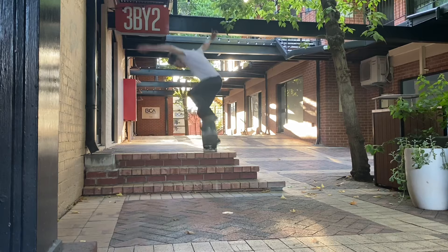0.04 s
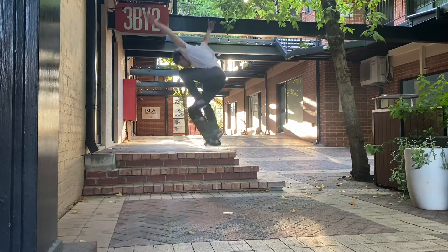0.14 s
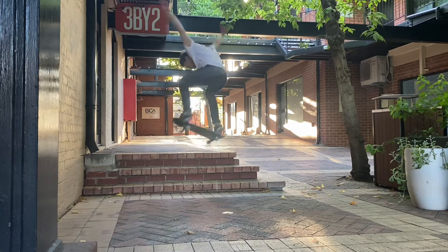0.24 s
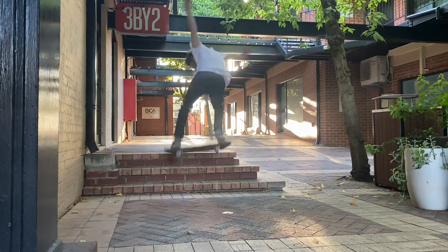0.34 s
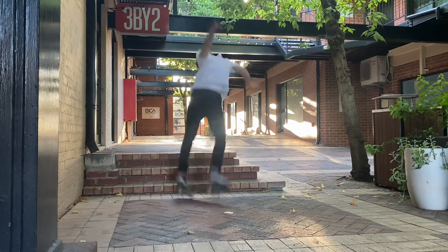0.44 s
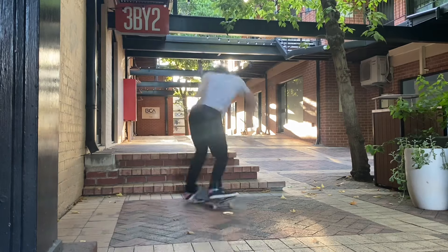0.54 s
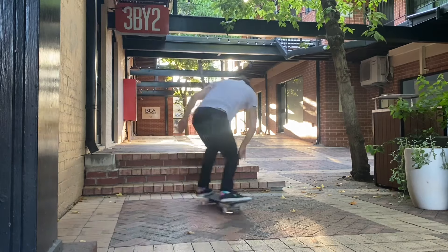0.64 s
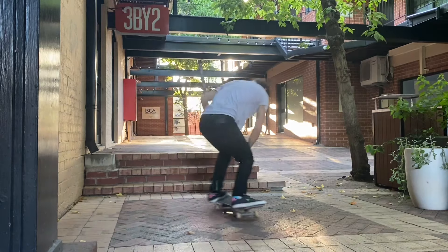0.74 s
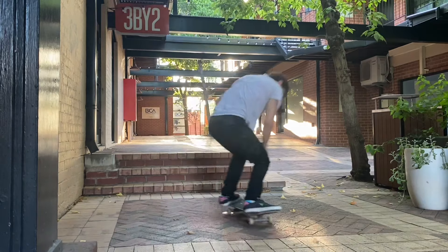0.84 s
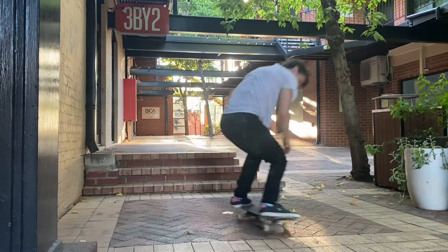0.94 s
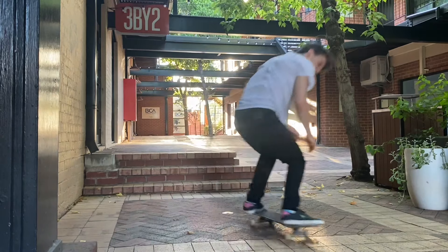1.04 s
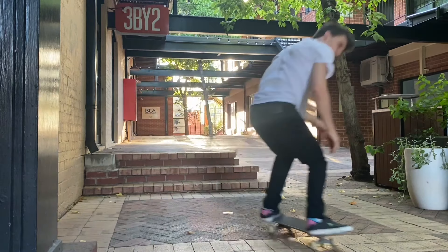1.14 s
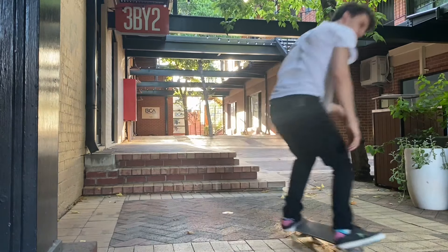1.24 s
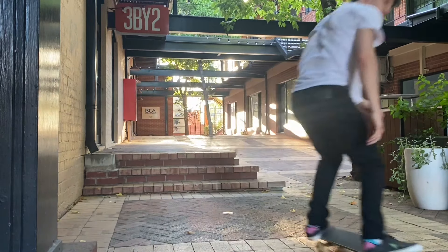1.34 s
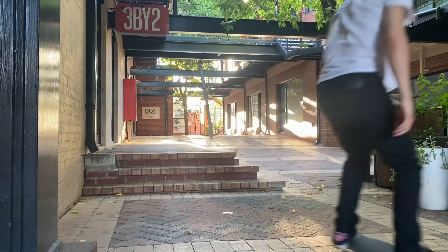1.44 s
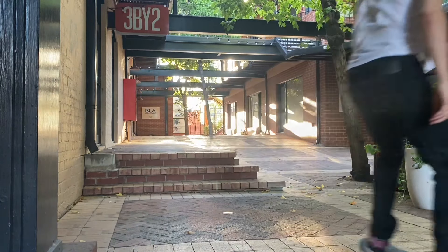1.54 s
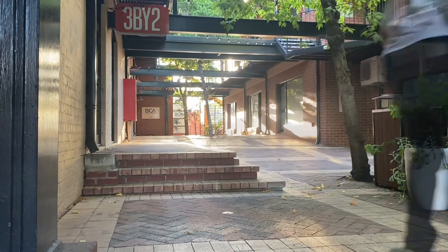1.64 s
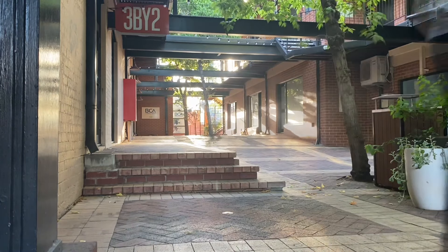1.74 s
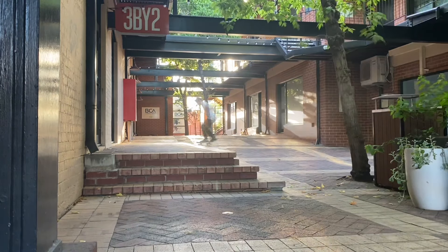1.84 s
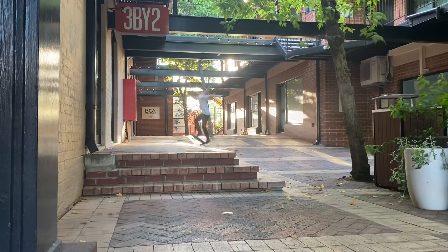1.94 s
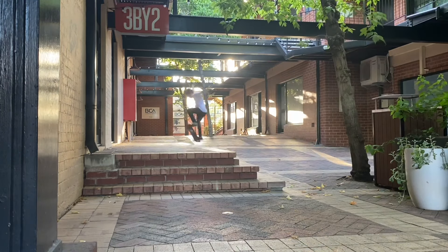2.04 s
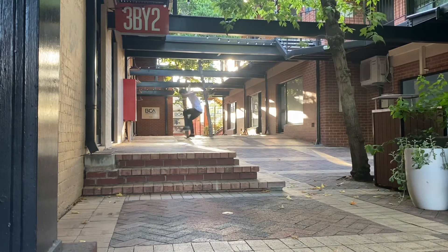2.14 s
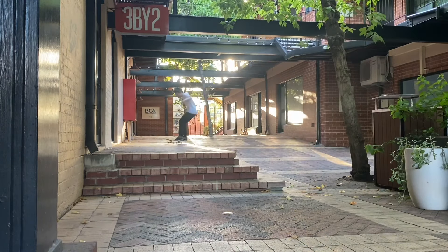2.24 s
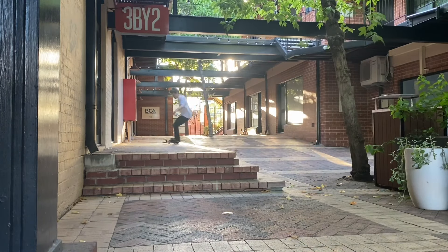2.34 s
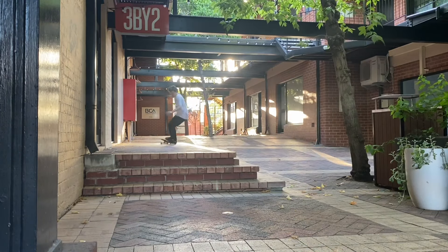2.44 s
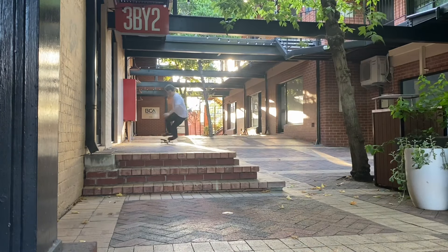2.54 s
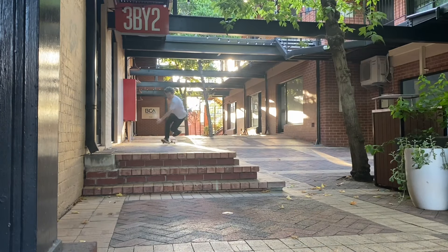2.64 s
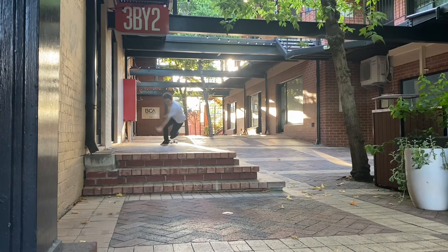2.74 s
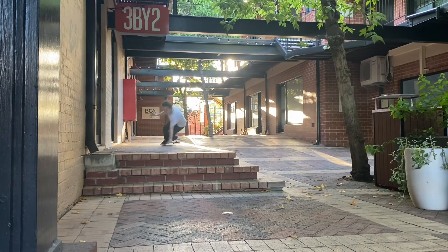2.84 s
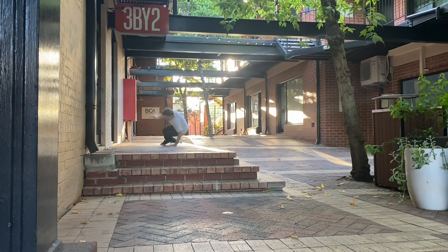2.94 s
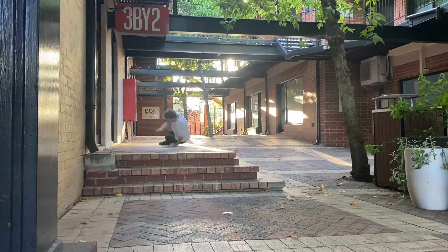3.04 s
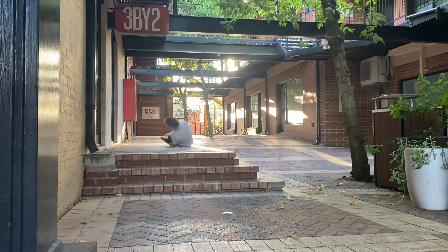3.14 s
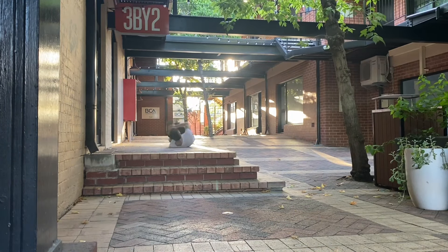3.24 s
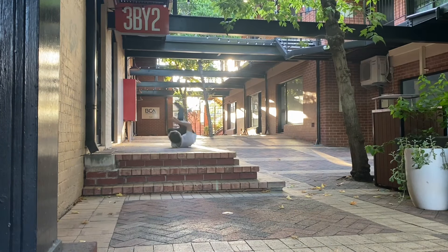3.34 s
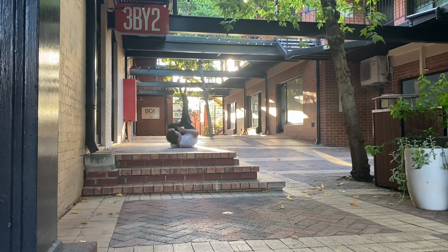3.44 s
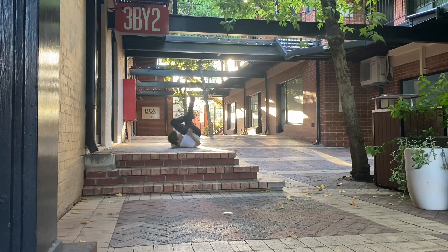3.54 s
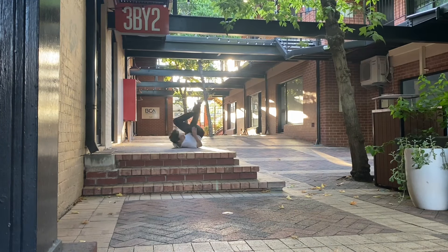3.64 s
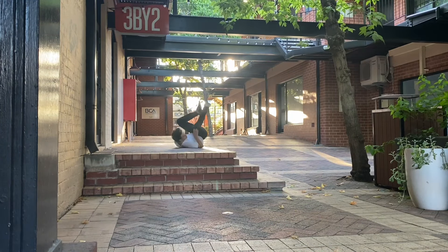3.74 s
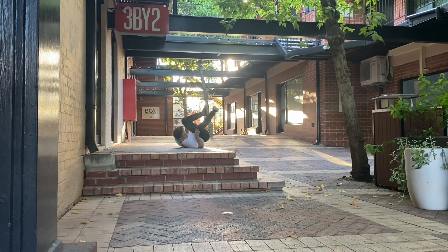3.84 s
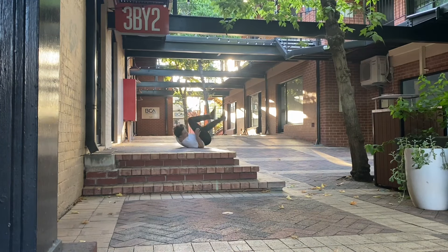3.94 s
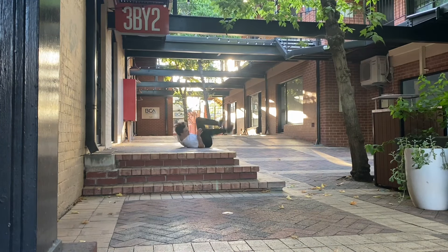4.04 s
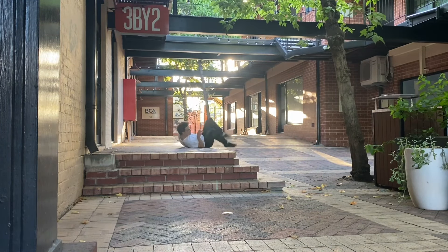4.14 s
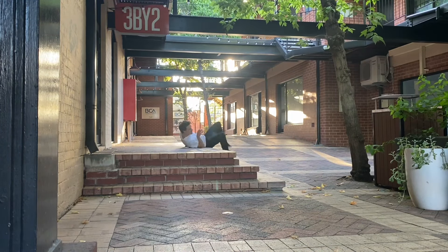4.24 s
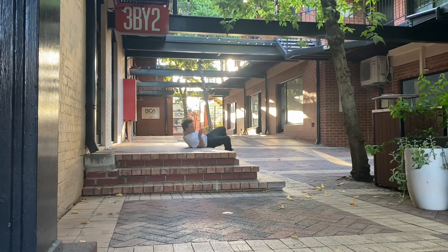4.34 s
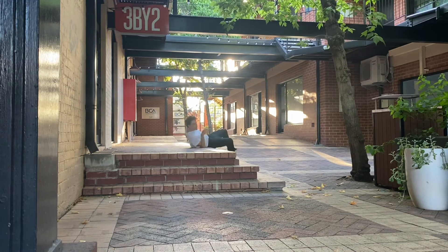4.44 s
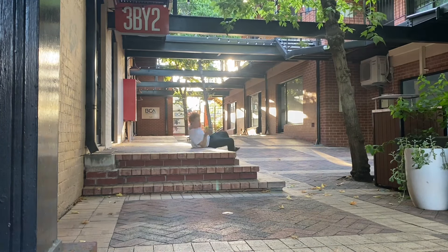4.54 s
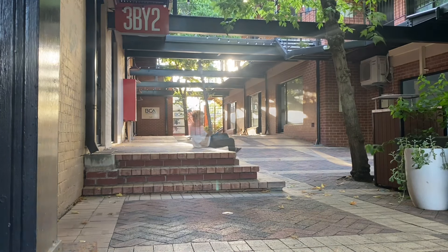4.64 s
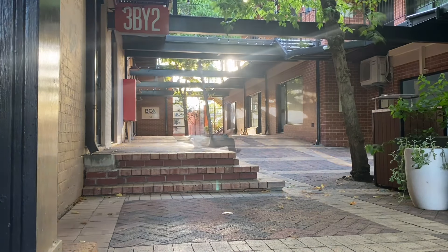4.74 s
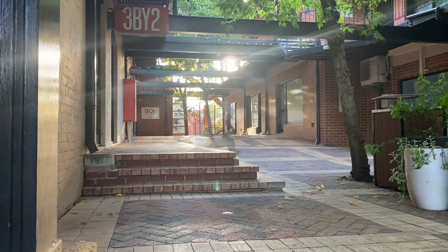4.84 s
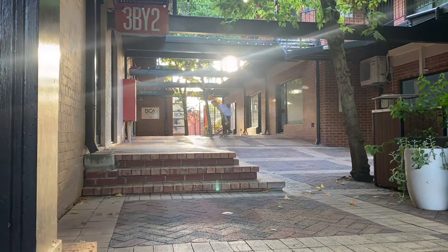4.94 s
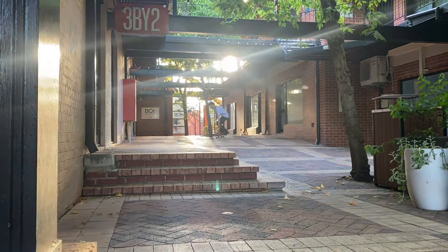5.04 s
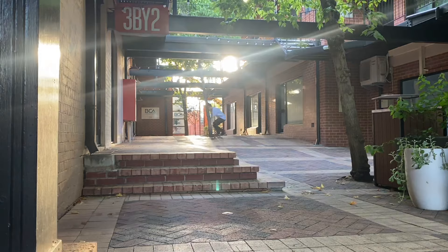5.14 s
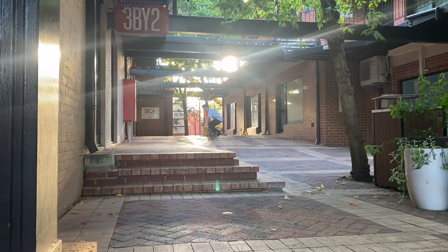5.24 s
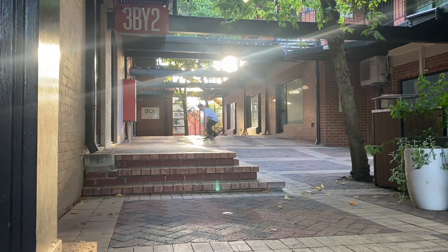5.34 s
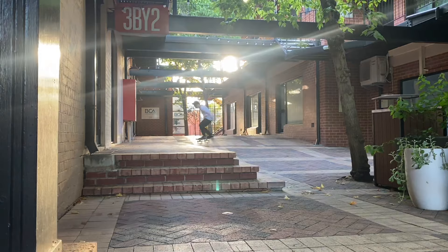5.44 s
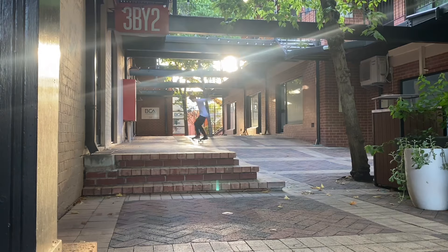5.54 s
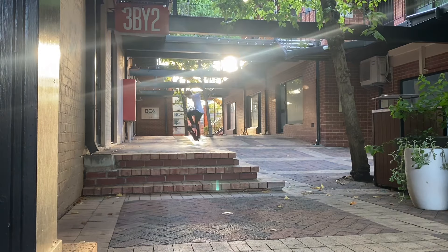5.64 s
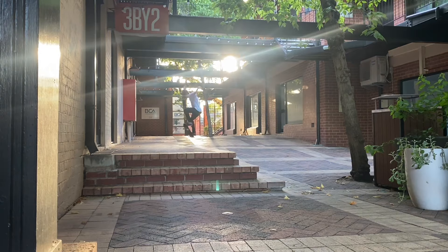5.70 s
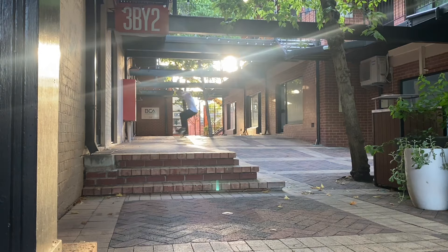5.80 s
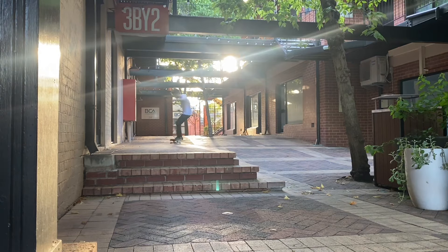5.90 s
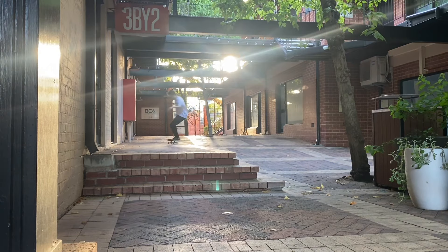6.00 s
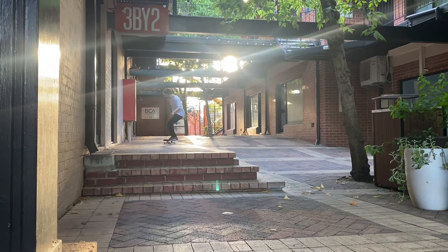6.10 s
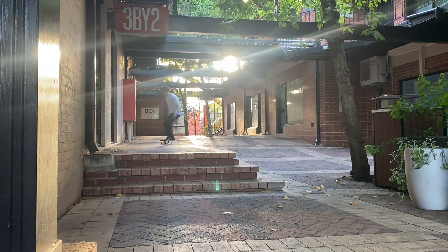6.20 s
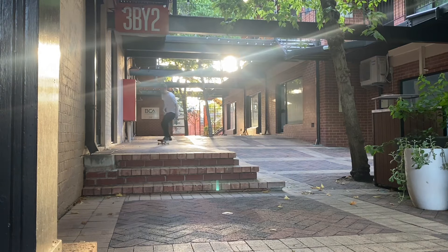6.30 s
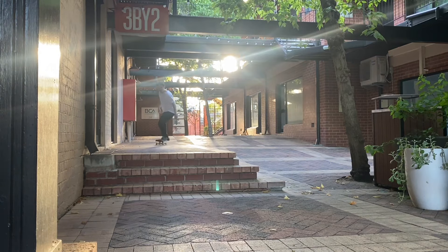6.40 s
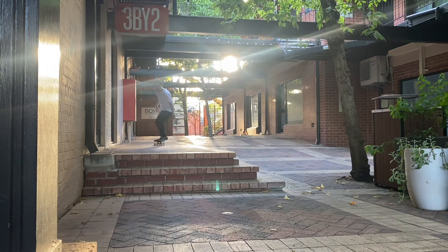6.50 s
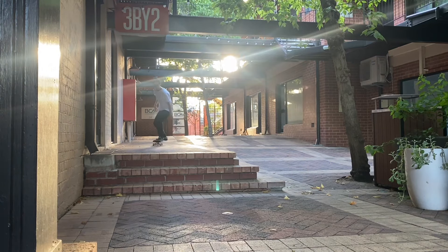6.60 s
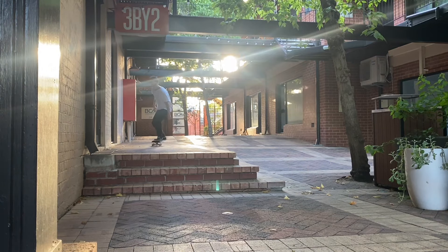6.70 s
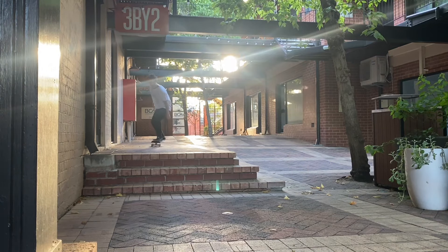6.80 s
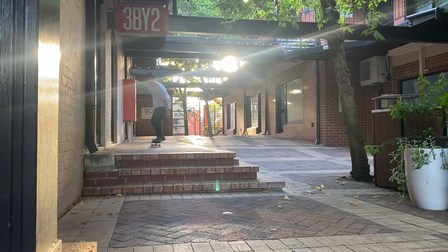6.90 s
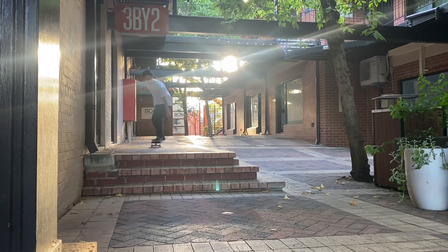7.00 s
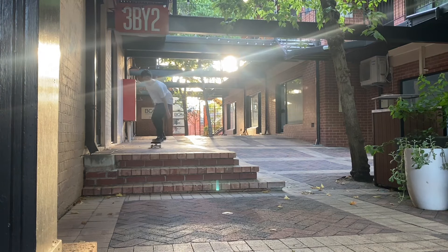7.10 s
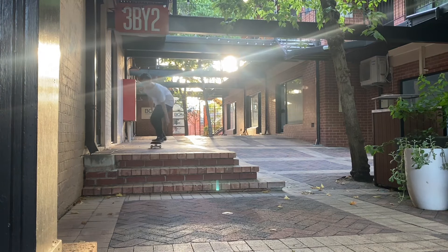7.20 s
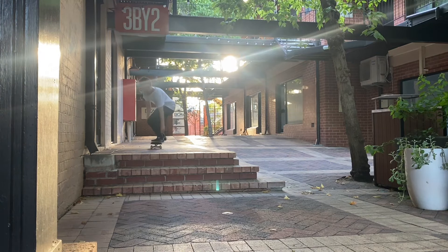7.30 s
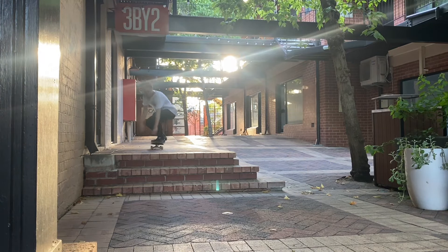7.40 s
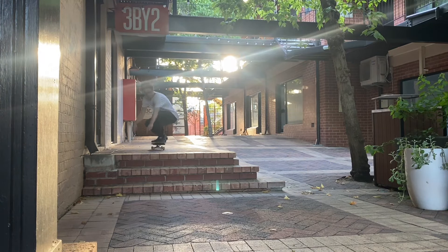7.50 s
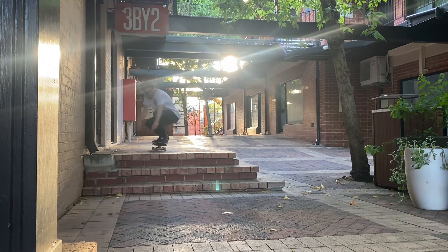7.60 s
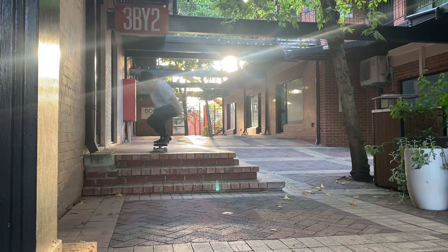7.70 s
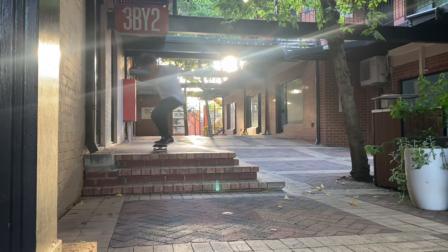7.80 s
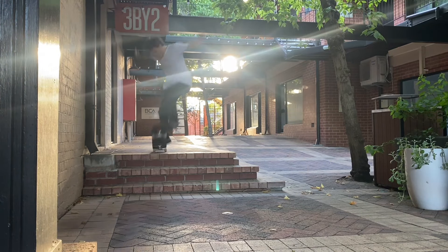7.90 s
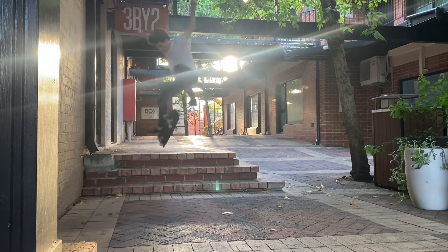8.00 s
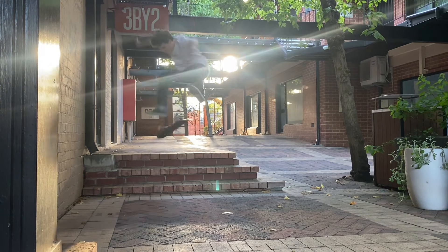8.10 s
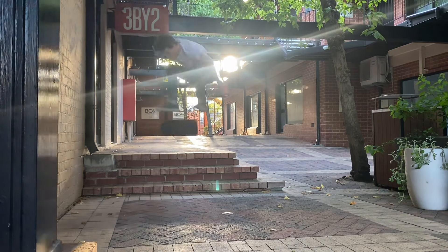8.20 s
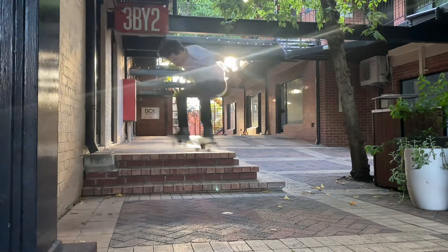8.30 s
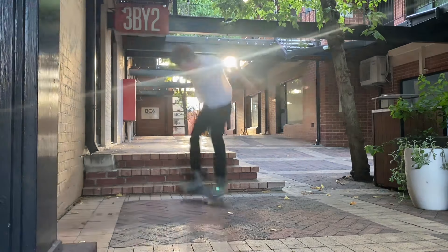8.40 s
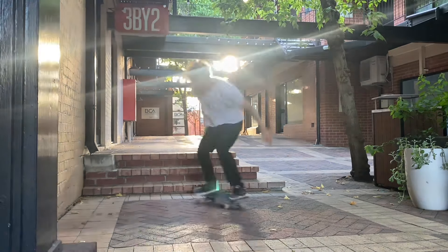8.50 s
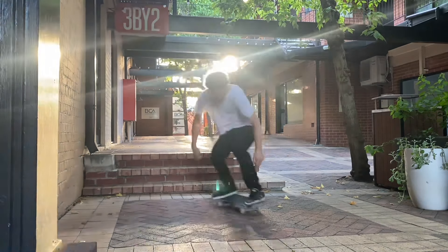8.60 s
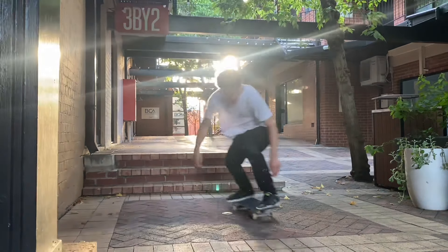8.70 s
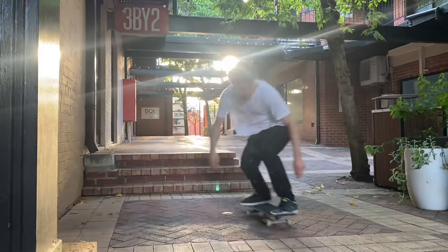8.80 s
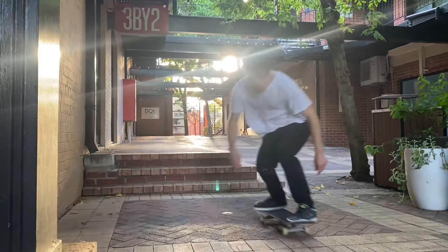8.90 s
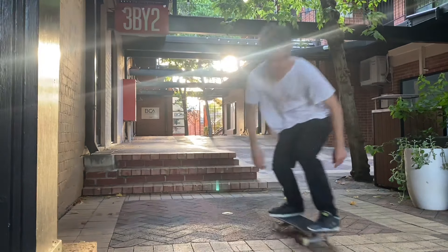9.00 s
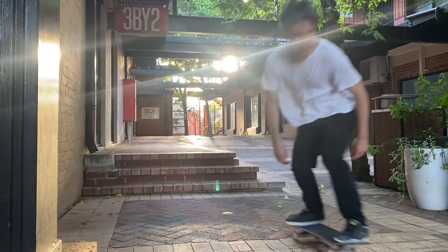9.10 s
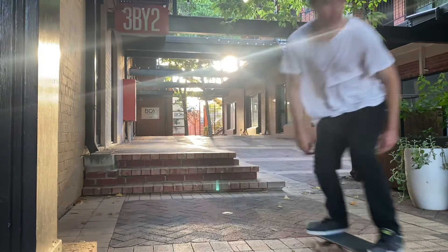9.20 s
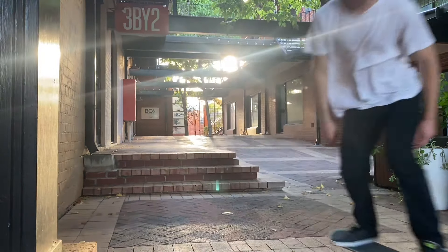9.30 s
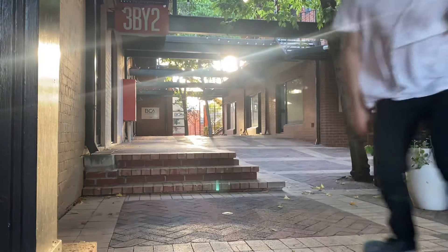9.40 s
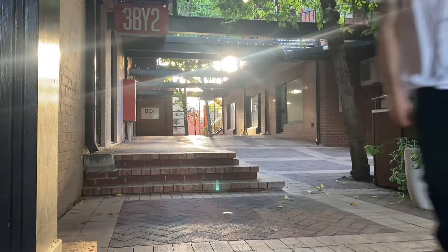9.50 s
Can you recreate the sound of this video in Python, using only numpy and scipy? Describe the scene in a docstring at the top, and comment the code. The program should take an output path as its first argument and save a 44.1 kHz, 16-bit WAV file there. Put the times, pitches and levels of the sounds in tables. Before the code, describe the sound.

Stereo microphone standing in a reverberant covered yard: skateboard wheels rattle over brick joints, swelling before each jump and dropping away in the air. Bright wooden snaps are followed by uneven clusters of wheel impacts. The first ride passes very near; the second falls apart far off with knocks, a thump and scuffing. Two more jumps follow, the last landing hard and rolling up close, over faint town hum.

```python
"""Skateboard jumps in a brick courtyard

A skateboarder rides over brick paving in a covered courtyard, mostly some 2 to 20 m from the microphone.
He jumps four times, twice down a flight of steps; once he falls and the board rolls away.
Tail pops are noise bursts with decaying deck modes; landings and knocks add a sagging ring to a clatter.
Rolling is coloured noise shaken by brick joints; thumps are low sines, scuffs and distant traffic are noise.
Brick walls answer with decaying noise tails, and a fast limiter holds the loudest blows down.
"""
import sys
import numpy as np
from scipy import signal
from scipy.fft import rfft, irfft, next_fast_len
from scipy.io import wavfile
from scipy.ndimage import uniform_filter1d, minimum_filter1d, map_coordinates

SR = 44100
rng = np.random.default_rng(int(sys.argv[2]) if len(sys.argv) > 2 else 0)


def master_out(mix):
    """Clip the mix to full scale and print it as 16-bit PCM to the path in sys.argv[1]."""
    frames = np.transpose(np.atleast_2d(mix))
    ceiling = np.clip(frames, -1, 1)
    pcm = np.round(ceiling * 32767).astype(np.int16)
    wavfile.write(sys.argv[1], SR, pcm)


N = 421155  # samples

# Hard clacks of the board: tail pops, a catch, wood and trucks on brick. Each row: start in seconds,
# level in dB, snap centre in Hz, snap t60 in seconds, wooden knock in Hz,
# ring over the walls' usual answer in dB.
POPS = [(.055, -11, 3400, 0.037, 2050, 5), (1.986, -10.5, 3020, 0.015, 2480, 7.5),
        (2.695, -23.5, 5600, 0.048, 4920, 4), (3.586, -37, 2310, 0.081, 2320, 8.5),
        (5.371, -20, 2200, 0.022, 1980, -2), (5.638, -8, 3597, 0.018, 1510, 7),
        (7.9428, -8, 2550, 0.035, 2075, 5.5), (7.953, -16, 2100, 0.031, 1390, 3.5),
        (8.298, -8, 1750, 0.012, 1735, 5), (8.335, -20.5, 2112, 0.074, 1540, 6),
        (9.128, -18, 1600, 0.051, 1880, 3)]
# Colour of the snap at the board. Each row: frequency in Hz, density in dB per Hz.
SNAP_COLOUR = [(60, -14), (200, -7), (700, -19), (1400, 11), (2400, 5), (4500, 0.5), (7500, 2),
               (16000, -16)]
# Colour of a clack among the walls. Each row: frequency in Hz, density in dB per Hz.
WALL_COLOUR = [(60, -38), (200, 4), (450, -4), (1000, -4), (1400, 1), (2400, -0.5), (3000, -3.5),
               (4800, -9.5), (6000, -7), (8000, -16), (11000, -17.5), (16000, -32)]
# The far walls answer a clack. Each row: delay in seconds, level over the ring in dB.
ECHOES = [(.06, -9), (.15, -13)]


def pops(air_hz=5000):
    """Wood snaps on brick or shoe; the deck's ring fills the yard and the far walls answer late."""
    out = np.zeros((2, N))
    for s, db, snap_hz, t60, knock_hz, wet_db in POPS:
        def snap_db(hz):
            octaves = np.log2((hz + 100) / snap_hz)
            return along(SNAP_COLOUR, hz) - np.minimum(16, 6 * octaves ** 2)

        def ring_db(hz):
            # a brighter snap wakes more of the deck's upper modes
            brightness = 1.1 * np.log2(snap_hz / 2800) * np.log2(1 + hz / 1000)
            return along(WALL_COLOUR, hz) + humps(DECK_MODES, hz) + brightness

        def echo_colour_db(hz):
            return ring_db(hz) - (hz / air_hz) ** 2  # air soaks up the treble

        snap = amp(db) * burst(snap_db, t60)
        ring = np.linalg.norm(snap) * wetness(s) * amp(wet_db)
        add(out, s, snap + amp(db) * wood(knock_hz, t60))
        add(out, s, ring * reverberation(ring_db))
        for delay, echo_db in ECHOES:
            add(out, s + delay, ring * amp(echo_db) * reverberation(echo_colour_db))
    return out


# The maple deck with its trucks, ringing free.
# Each row: frequency in Hz, width in Hz (for the walls' colour only), strength in dB.
DECK_MODES = [(537, 23, 11), (761, 87, 13.5), (1314, 53, 12), (1530, 77, 5), (1890, 48, 4.5),
              (2233, 61, 10.5), (2490, 46, 5), (3420, 86, -1.5), (4100, 64, 2), (4450, 100, 10),
              (4830, 170, 9)]
KNOCK_DB = -5.5  # knock of the struck spot, over the snap at its start
MODES_DB = -9  # energy of the free modes, over the knock before KNOCK_DB


def wood(knock_hz, t60, mode_t60=0.079, detune=.02):
    """The struck spot knocks briefly; the deck's modes ring on, mixed anew by every blow."""
    t = np.arange(SR // 3) / SR

    def ring(hz, db, life):
        return amp(db - 60 * t / life) * np.sin(2 * np.pi * hz * t)

    chance = rng.standard_normal((len(DECK_MODES), 2))
    modes = 0
    for k, ((hz, _, db), (shift, gain)) in enumerate(zip(DECK_MODES, chance)):
        modes = modes + (-1) ** k * ring(hz * (1 + detune * shift), db + 2 * gain, mode_t60)
    knock = np.sqrt(2) * ring(knock_hz, 0, t60 * 1.17)
    matched_modes = modes * np.linalg.norm(knock) / np.linalg.norm(modes)
    return amp(KNOCK_DB) * knock + amp(MODES_DB) * matched_modes


# Tail, front and rear wheels come down. Each row: start in seconds, level in dB, tilt in dB per octave,
# weight in the bass in dB, clatter t60 in seconds, ring in Hz, ring over the clatter in dB.
LANDINGS = [(0.4501, -6.5, 2, -2, 0.059, 1700, -13), (0.453, -13, -4, -6, 0.029, 360, 2),
            (0.459, -10, 4, -3, 0.036, 2214, -14), (0.465, -16, 0.5, 0, 0.038, 1398, -0.5),
            (0.470, -11, 1.5, 6, 0.08, 687, -2.5), (0.505, -22, 1, 2, .08, 670, 2.5),
            (1.03, -18.5, 1, -3, 0.066, 400, 0.5), (1.044, -26, 1, -2, 0.07, 685, 4),
            (1.058, -23, 2, 6, 0.07, 476, 1), (2.262, -18.5, 0.5, -1.5, 0.15, 754, -8),
            (2.295, -23.5, -0.5, -6, 0.09, 825, -4), (2.335, -24.5, -0.5, 0, 0.061, 834, -2),
            (2.377, -27.5, 0.5, 2, 0.07, 697, -3), (5.915, -16, 2, -9, 0.06, 1740, -10),
            (5.922, -14.5, -0.5, -6, 0.06, 1340, 0), (5.928, -21, 0, -3, 0.06, 1110, 2),
            (5.943, -19, 1.5, 8, 0.062, 535, -0.5), (5.968, -19, 0, -6, 0.06, 775, -3),
            (8.311, -18, 1.5, 6, 0.098, 1160, -5), (8.358, -28, 3.5, 2, .06, 1140, -6),
            (8.418, -6.5, 2.5, -23, 0.046, 1804, -8), (8.422, -11.5, 2, -11, 0.05, 633, -2),
            (8.429, -13, 0, -17, 0.046, 1050, -3), (8.433, -15, 0, -3, 0.062, 700, -1),
            (8.445, -23, 1, 4, 0.11, 1345, -1)]


def landings():
    """Tail and wheels come down in an uneven cluster, each contact with its own ring."""
    out = np.zeros((2, N))
    for s, db, tilt, weight_db, t60, hz, ring_db in LANDINGS:
        blow = amp(db) * strike(tilt, t60, hz, ring_db, weight_db)
        add(out, s, blow)
        add(out, s, wetness(s) * wash(blow))
    return out


def wash(blow, blur=.07, level_db=3.0):
    """The walls' answer to a landing: countless paths blur its colour into an even, noisy tail."""
    grid = np.fft.rfftfreq(len(blow), 1 / SR)
    energy = np.cumsum(np.abs(rfft(blow)) ** 2)

    def colour_db(hz):
        half = blur * hz + 10  # half the blurring width, Hz
        power = (np.interp(hz + half, grid, energy) - np.interp(hz - half, grid, energy)) / half
        return 10 * np.log10(np.abs(power) + 1e-12)

    return amp(level_db) * np.linalg.norm(blow) * reverberation(colour_db, build=0.0067)


RING_S = 0.089  # t60 of a struck spot of the loaded deck
SAG, SAG_S = 0.1, 0.0046  # fraction by which its pitch starts sharp, time constant of settling


def strike(tilt, t60, hz, ring_db, weight_db=0, attack=0.0007, waver=0.49):
    """A contact's clatter and the hollow ring of the struck spot, which sags as the weight arrives."""
    clatter = slam(tilt, t60, weight_db)
    t = np.arange(len(clatter)) / SR
    pitch = hz * (1 + SAG * np.exp(-t / SAG_S))
    phase = 2 * np.pi * np.cumsum(pitch) / SR + waver * wobble(204, len(t))
    envelope = amp(ring_db - 60 * t / RING_S) * (1 - np.exp(-t / attack))
    return clatter + np.sqrt(2) * envelope * np.sin(phase)


# Colour of wheels slamming on brick. Each row: frequency in Hz, density in dB per Hz.
SLAM_COLOUR = [(30, -52), (80, 5), (180, 0.5), (330, 0.5), (700, -2.5), (1050, -4), (1400, -7.5),
               (2400, -9.5), (4500, -13), (7500, -20), (16000, -29.5)]
# The deck knocks under the rider's feet. Each row: frequency in Hz, width in Hz, strength in dB.
LOADED_DECK = [(340, 39, 3), (730, 180, 1.5), (935, 97, -1), (1300, 450, 3.5), (2120, 740, 4),
               (4100, 230, 2)]


def slam(tilt, t60, weight_db=0):
    """Wheels strike brick through the loaded deck; hard contact is brighter, the rider's weight adds bass."""
    def colour_db(hz):
        contact_db = tilt * np.log2(1 + hz / 500) + weight_db / (1 + (hz / 350) ** 4)
        return along(SLAM_COLOUR, hz) + humps(LOADED_DECK, hz) + contact_db

    return burst(colour_db, t60)


def burst(colour_db, t60, bass_hz=700, linger=2.44, rattle_db=5.5):
    """A hard contact: a dense, rattling clatter whose low part dies more slowly."""
    t = np.arange(SR // 3) / SR
    phases = np.exp(2j * np.pi * rng.random(len(t) // 2 + 1))
    noise = irfft(phases * amp(colour_db(np.fft.rfftfreq(len(t), 1 / SR))), len(t))
    noise = unit(noise * amp(rattle_db * np.tanh(wobble(325, len(t)))))
    low = filtered(noise, lambda hz: 1 / (1 + (hz / bass_hz) ** 2))
    return (noise - low) * amp(-60 * t / t60) + low * amp(-60 * t / (t60 * linger))


# Wheels knock against raised bricks. Each row: start in seconds, level in dB, tilt in dB per octave,
# ring in Hz, ring over the knock in dB.
KNOCKS = [(0.801, -24.5, 4.5, 2450, -10), (.882, -25.5, -2, 281, 6.5), (.972, -29.5, -0.5, 390, 7),
          (1.227, -27.5, 0.5, 688, 8), (1.799, -32, 0.5, 696, -2), (1.903, -28, -2, 765, -6),
          (2.237, -28, 2.5, 770, -2), (2.41, -23, -3, 730, -3.5), (2.479, -27.5, -2.5, 530, -4),
          (2.608, -33, 0.5, 1590, -5), (2.696, -22, 2, 180, 1), (2.717, -26, 2.5, 778, 4),
          (3.012, -38, 1, 250, 2), (3.901, -40.5, 4, 780, 0), (4.831, -37.5, -7, 750, 3),
          (6.53, -33, -10, 1310, 1), (6.755, -22.5, -2, 1290, -3.5), (7.34, -27.5, -12, 688, -0.5),
          (8.942, -25.5, 6.5, 399, -11), (8.961, -25.5, -3, 2094, -4), (9.045, -28, 2, 325, 5),
          (9.104, -24, 8.5, 1818, -2), (9.29, -24, 5, 1094, -9), (9.45, -23.5, 5, 817.7, -3)]
STRAY_RATE = 19  # lesser knocks per second
STRAY_DB, STRAY_SPREAD_DB = -11.5, -1.3  # over the untrimmed wheel roar; scatter per e-fold of chance
STRAY_LOW_HZ, STRAY_HIGH_HZ = 245, 808  # range of their rings
STRAY_RING_DB, STRAY_TILT = -1.5, -1.7  # ring over the knock; dB per octave


def knocks(t60=0.063, room_db=1.5, count=16):
    """Wheels knock against raised bricks; lesser knocks fall at random, as strong as the wheels roll."""
    out, t = np.zeros(N), np.arange(N) / SR
    rings_hz = np.geomspace(STRAY_LOW_HZ, STRAY_HIGH_HZ, count)
    shapes = [strike(STRAY_TILT, t60, hz, STRAY_RING_DB) for hz in rings_hz]
    for k, (when, size, spot) in enumerate(rng.random((int(STRAY_RATE * N / SR), 3))):
        gain = amp(STRAY_DB + STRAY_SPREAD_DB * np.log(size + .02))
        add(out, (k + when) / STRAY_RATE, gain * shapes[int(spot * count)])
    out = out * ride(t)[1]
    for s, db, tilt, hz, ring_db in KNOCKS:
        add(out, s, amp(db) * strike(tilt, t60, hz, ring_db))
    return out + amp(room_db) * courtyard(out * wetness(t))[:, :N]


# Dull thumps of the body and the loaded deck.
# Each row: start in seconds, level in dB, pitch in Hz, t60 in seconds.
THUMPS = [(0.453, -17, 104, .11), (1.338, -12, 147, 0.11), (1.40, -10.5, 260.3, 0.08),
          (1.462, -6, 160.7, 0.073), (1.53, -7, 169, 0.066), (1.605, -5, 141, 0.074),
          (1.659, -9, 142, 0.091), (1.703, -10, 176, 0.078), (1.769, -16.5, 147.2, .14),
          (2.281, -7.5, 196.8, 0.19), (2.35, -15, 280, .08), (2.475, -13.5, 198.4, 0.15),
          (2.699, -17, 145.3, 0.3), (3.222, -16, 86, 0.1), (4.542, -15.5, 109.8, 0.084),
          (5.637, -15, 203, .09), (5.939, -10.5, 159.3, 0.29), (6.76, -8.5, 112.9, 0.08),
          (7.943, -19, 202, .07), (8.46, -7.5, 238, 0.078), (9.124, -6.5, 268, 0.068),
          (9.452, -7, 123.1, 0.23), (9.508, -9, 135, .15)]


def thumps(attack=0.0069):
    """Low, dull thumps of the body and the deck: each a decaying sine with a wavering phase."""
    out, t = np.zeros(N), np.arange(SR // 2) / SR
    for s, db, hz, t60 in THUMPS:
        swing = np.sin(2 * np.pi * hz * t + 1.85 * wobble(59.4, len(t)))
        add(out, s, amp(db - 60 * t / t60) * (1 - np.exp(-t / attack)) * swing)
    return out


# Colour of the deck's rumble. Each row: frequency in Hz, density in dB per Hz.
RUMBLE_COLOUR = [(30, -31), (80, -7), (125, 0), (190, -4.5), (235, -4.5), (290, -3.5), (420, -10.5),
                 (700, -21), (1500, -52)]
# The loaded deck flexes as it rolls. Each row: frequency in Hz, width in Hz, strength in dB.
DECK_FLEX = [(111.6, 33, 4), (192.5, 19, 7.5), (280, 26, 2), (364, 51, 6.5)]
# Colour of the wheels' roar. Each row: frequency in Hz, density in dB per Hz.
ROAR_COLOUR = [(150, -20), (350, -19), (480, -1), (750, -1.5), (1000, -7.5), (1500, -12), (2300, -17.5),
               (4000, -36), (8000, -64)]
# Wheel and truck resonances. Each row: frequency in Hz, width in Hz, strength in dB.
WHEEL_MODES = [(540, 85, 0.5), (678, 39, 6.5), (1190, 250, 2.5), (1700, 120, 2)]
# Colour of grit under the wheels. Each row: frequency in Hz, density in dB per Hz.
GRIT_COLOUR = [(700, -7), (2000, 4.5), (4200, 10.5), (7000, 5), (16000, -6)]
# Colour of the finest crackle. Each row: frequency in Hz, density in dB per Hz.
SAND_COLOUR = [(2000, -22), (8000, 0), (16000, -3)]
# The rumble and roar rise and sink in pitch along the ride. Each row: time in seconds, pitch ratio.
GLIDE = [(0, 1.01), (.6, 1.034), (1.25, 1), (1.55, 1.04), (1.8, 0.86), (1.9, 1.016), (2.7, 1.043),
         (5.4, 1.09), (6.3, 1), (7.1, .98), (7.9, 0.96), (8.6, 1.215), (9.1, 1), (9.55, 0.8)]
RUMBLE_DB, ROAR_DB = 1, 3  # trims of the two layers
GRIT_DB, GRIT_GROWS = -16.5, 0.78  # grit: offset, dB per dB of untrimmed roar
SAND_DB = -18  # over the untrimmed roar
GRIT_NEAR_DB, SAND_NEAR_DB = 1, 4.5  # gains for each halving of distance


def rolling():
    """Joints and rough brick shake the deck and the wheels; grit crackles under them."""
    t, jolts = np.arange(N) / SR, paving()
    rumble, roar = ride(t)
    grit_level = roar ** GRIT_GROWS * amp(GRIT_DB - GRIT_NEAR_DB * remoteness(t))
    travel = np.cumsum(curve(GLIDE)) % N

    def shaken(depth):
        return rng.standard_normal((2, N)) * np.sqrt(1 + (depth * jolts) ** 2)

    def gliding(pair):
        return np.array([np.interp(travel, np.arange(N), side) for side in pair])

    deck = diffuse(patchy(shaken(0.61), depth_db=1.72),
                   lambda hz: along(RUMBLE_COLOUR, hz) + humps(DECK_FLEX, hz))
    wheels = diffuse(patchy(shaken(0.83), depth_db=3.0),
                     lambda hz: along(ROAR_COLOUR, hz) + humps(WHEEL_MODES, hz))
    out = amp(RUMBLE_DB) * rumble * gliding(deck) + amp(ROAR_DB) * roar * gliding(wheels)
    out += grit_level * diffuse(patchy(shaken(0.58), depth_db=4.0), lambda hz: along(GRIT_COLOUR, hz))
    # the finest crackle carries best when the board is close
    sand = diffuse(shaken(0.71) * amp(1.5 * wobble(700)), lambda hz: along(SAND_COLOUR, hz))
    return out + roar * amp(SAND_DB - SAND_NEAR_DB * remoteness(t)) * sand


# One list for each stretch of riding.
# Each row: time in seconds, deck rumble in dB and wheel roar in dB, both before push, lift and trims.
ROLLS = [
    [(0, -31, -33.5), (0.6, -36.5, -36.5), (0.8, -29, -29.5), (1.25, -25.5, -35.5), (1.704, -29.5, -37.5),
     (1.886, -29, -37.5), (1.95, -33.5, -37.5)],
    [(2.33, -35, -25), (2.42, -26, -29.5), (2.5, -31, -37.5), (2.66, -38, -36), (2.72, -29.5, -31.5),
     (2.9, -38, -41.5), (3.334, -43.5, -47.5), (3.4, -52, -44.5)],
    [(3.6, -49, -50), (3.78, -60, -47.5), (3.97, -51, -42), (4.096, -50, -48), (4.5, -55, -55)],
    [(4.6, -46, -74), (4.7, -42, -51), (4.9, -32, -36.5), (5.378, -25.5, -33), (5.6, -30, -34.5)],
    [(6.3, -28.5, -34), (7.558, -29.5, -35), (7.782, -25, -34), (7.88, -31, -36.5)],
    [(8.6, -36, -38.5), (8.93, -26.5, -30), (9.184, -24.5, -29.5), (9.374, -24.5, -33.5), (9.42, -24, -34)],
]
PUSH_DB, PUSH_S = 5.5, 0.027  # the rider pushes down just before each take-off
LIFT_DB_PER_S, SETTLE_S = 181, 0.049  # drop per second of flight; return after touchdown


def ride(t):
    """Gains of deck rumble and wheel roar at times t: a swell before take-off, a fade in flight."""
    s, *levels = np.transpose(np.concatenate(ROLLS))
    load_db = 0
    for start, end, _ in FLIGHTS:
        times = [start - PUSH_S, start, end, end + SETTLE_S]
        load_db = load_db + np.interp(t, times, [0, PUSH_DB, -LIFT_DB_PER_S * (end - start), 0])
    return [amp(np.interp(t, s, db) + load_db) for db in levels]


def paving(joint_rate=42, life=0.02):
    """Jolts of rms 1: four wheels drop into brick joints at uneven intervals."""
    times = np.cumsum(rng.gamma(2, 1 / (2 * joint_rate), size=800))
    index = (times[times < N / SR] * SR).astype(int)
    kicks = np.bincount(index, rng.rayleigh(size=800)[:len(index)], N)
    return unit(signal.lfilter([1], [1, -np.exp(-1 / (life * SR))], kicks))


def patchy(pair, depth_db):
    """Each brick favours other frequencies for a moment."""
    z = signal.stft(pair, nperseg=2048)[2]
    field = uniform_filter1d(rng.standard_normal(z.shape[1:]), size=3, axis=0)
    field = uniform_filter1d(field, size=4, axis=1)
    return signal.istft(z * amp(depth_db * unit(field)), nperseg=2048)[1][:, :N]


# The board is in the air and its wheels spin freely.
# Each row: start in seconds, end in seconds, bearing whirr in dB.
FLIGHTS = [(0.031, .45, -35.5), (1.952, 2.231, -59), (5.619, 5.93, -44), (7.941, 8.41, -39.5)]
# Colour of the bearings. Each row: frequency in Hz, density in dB per Hz.
WHIRR_COLOUR = [(300, 3), (1000, 9), (2500, 7.5), (4500, 0), (6000, -5), (10000, -15), (16000, -16)]


def bearings(fade_db=200):
    """Unloaded wheels spin with a dry whirr, fading by fade_db a second before and after each flight."""
    t = np.arange(N) / SR
    level = sum(amp(db - fade_db * np.abs(t - np.clip(t, start, end))) for start, end, db in FLIGHTS)
    noise = rng.standard_normal((2, N)) * amp(1.5 * wobble(160))
    return level * diffuse(noise, lambda hz: along(WHIRR_COLOUR, hz))


# Grit is crushed under the wheels as they pass close by. Each row: start in seconds, level in dB.
TICKS = [(1.515, -35), (1.532, -30), (1.604, -23), (1.625, -34), (1.667, -33), (1.738, -33), (1.816, -37)]
# Colour of a cracking grain. Each row: frequency in Hz, density in dB per Hz.
TICK_COLOUR = [(1500, -22), (3000, -8), (4400, 6), (7000, -10), (16000, -9)]


def ticks(t60=0.024):
    """Grains of grit crack close to the microphone, short and dry."""
    out = np.zeros(N)
    for s, db in TICKS:
        add(out, s, amp(db) * burst(lambda hz: along(TICK_COLOUR, hz), t60))
    return out


# Shoes and clothes scuff over the bricks. Each row: start in seconds, length in seconds, level in dB.
SCUFFS = [(2.981, 0.42, -39.5), (3.58, 0.18, -39.5), (5.019, .11, -36.5), (8.677, 0.21, -34)]
# Colour of a scuff. Each row: frequency in Hz, density in dB per Hz.
SCUFF_COLOUR = [(600, 12), (2000, 8.5), (4500, 2), (7500, -6), (12000, -7), (16000, -24)]


def scuffs(grain_db=2.0):
    """Each scuff is a gritty rub that swells and lets go."""
    out = np.zeros((2, N))
    for s, length, db in SCUFFS:
        n = int(length * SR)
        grains = rng.standard_normal((2, n)) * amp(grain_db * wobble(239.0, n))
        rub = diffuse(grains, lambda hz: along(SCUFF_COLOUR, hz))
        add(out, s, amp(db) * np.sin(np.pi * np.arange(n) / n) * rub)
    return out


# Where the board is, seen from the microphone.
# Each row: time in seconds, direction in degrees to the right, distance in metres.
PATH = [(0, -4.5, 7.8), (.5, -6, 4.5), (1.0, 7.5, 4.6), (1.7, 16, 1.6), (1.8, -9, 19.65), (2.7, -8.5, 9),
        (3.6, 21, 16.6), (5.4, -6.5, 14.7), (6.2, -9, 10.6), (8.0, -9.5, 7), (8.45, -5.5, 6.24),
        (9.0, 13, 6.3), (9.55, 12, 2.38)]


def ports(pair, spacing=0.08):
    """The nearer of two microphone ports, spacing metres apart, hears the board first."""
    lag = spacing * np.sin(np.radians(curve([row[:2] for row in PATH]))) * SR / 343  # samples
    return np.array([map_coordinates(side, [np.arange(N) - sign * lag / 2], mode="nearest")
                     for side, sign in zip(pair, (1, -1))])


def remoteness(s):
    """Doublings of the board's distance beyond 10 m at time s."""
    times, _, metres = np.transpose(PATH)
    return np.log2(np.maximum(np.interp(s, times, metres), 1) / 10)


ROOM_DB, ROOM_GROWS_DB = -1, 7  # walls over direct sound at 10 m; gain per doubling of distance


def wetness(s):
    """The farther the board, the more of its sound comes from the walls."""
    return amp(ROOM_DB + ROOM_GROWS_DB * remoteness(s))


def courtyard(x):
    """The walls' answer to a run of knocks."""
    return signal.fftconvolve(x[None], reverberation(np.zeros_like), axes=1)


# The covered courtyard's decay. Each row: frequency in Hz, t60 in seconds.
YARD_DECAY = [(100, 0.77), (300, 0.86), (800, 0.82), (2000, 0.83), (4800, 0.72), (8000, 0.35),
              (14000, 0.33)]


def reverberation(colour_db, build=0.0034):
    """A fresh stereo tail, its left side of energy 1: it swells briefly and dies by band."""
    hz, t, z = signal.stft(diffuse(rng.standard_normal((2, SR)), colour_db), SR, nperseg=256)
    decay = amp(-60 * t / along(YARD_DECAY, hz)[:, None])
    tail = signal.istft(z * decay, SR, nperseg=256)[1][:, :SR]
    tail = tail * (1 - np.exp(-np.arange(SR) / SR / build))
    return tail / np.linalg.norm(tail[0])


# Left-right likeness of the courtyard's sound. Each row: frequency in Hz, coherence from 0 to 1.
ALIKE = [(60, 0.99), (130, 1), (220, 0.94), (380, 0.3), (650, 0.092), (1400, 0.025), (3000, 0.51),
         (7000, 0.088), (15000, 0.017)]


def diffuse(pair, colour_db):
    """Two unrelated signals become a coloured stereo field of rms 1, nearly mono in the bass."""
    def mid_side(hz):
        turn = np.arccos(np.clip(along(ALIKE, hz), -1, 1)) / 2
        return amp(colour_db(hz)) * [np.cos(turn), np.sin(turn)]

    mid, side = filtered(pair, mid_side)
    return unit(np.array([mid + side, mid - side]))


# Colour of distant traffic. Each row: frequency in Hz, density in dB per Hz.
TOWN_COLOUR = [(20, -34), (35, -5), (52, -1.5), (70, 2), (140, -5.5), (210, -7), (330, -18), (800, -22.5),
               (2000, -30.5), (6000, -41.5), (16000, -50)]


def town():
    """Distant traffic hums in the courtyard, wavering by a decibel or so."""
    noise = rng.standard_normal((2, N))
    return amp(-37.0 + wobble(3.8)) * diffuse(noise, lambda hz: along(TOWN_COLOUR, hz))


def amp(db):
    """Decibels to gain."""
    return 10 ** (np.asarray(db) / 20)


def unit(x):
    """Scale to rms 1."""
    return x / np.sqrt(np.mean(x ** 2) + 1e-20)


def along(points, hz):
    """Read (Hz, value) points on a log axis."""
    f, v = np.transpose(points)
    return np.interp(np.log(hz + 1), np.log(f), v)


def humps(resonances, hz):
    """Decibels that (Hz, width, dB) resonances add to a colour."""
    return sum(db / (1 + (2 * (hz - centre) / width) ** 2) for centre, width, db in resonances)


def curve(rows):
    """One value per sample from (s, value) rows."""
    return np.interp(np.arange(N) / SR, *np.transpose(rows))


def wobble(rate, size=N):
    """A smooth random curve with rate knots a second."""
    knots = rng.standard_normal(int(size * rate / SR) + 4)
    return map_coordinates(knots, [np.arange(size) * rate / SR])


def filtered(x, response):
    """x times a response of frequency."""
    n = x.shape[-1]
    m = next_fast_len(n + SR // 10, True)
    return irfft(rfft(x, m) * response(np.fft.rfftfreq(m, 1 / SR)), m)[..., :n]


def add(track, s, sound):
    """Mix a sound into the track at time s."""
    part = track[..., round(s * SR):][..., :sound.shape[-1]]
    part += sound[..., :part.shape[-1]]


def scene(left_db=0.5):
    """The board before the traffic; the wall on the left makes the board a little louder on that side."""
    board = pops() + bearings() + landings() + knocks() + ticks() + thumps() + scuffs() + rolling()
    return ports(board) * amp([[left_db], [-left_db]]) + town()


LOW_CUT_HZ, TOP_HZ = 41, 16100  # the microphone's bass limit, the upper band limit
CEILING_DB = -1  # limiter, re full scale


def record(dry, hold=0.0011):
    """The microphone sheds deep bass, a fast limiter holds the peaks, and a band limit cuts the top."""
    low_cut = signal.butter(3, LOW_CUT_HZ, "highpass", fs=SR, output="sos")
    heard = signal.sosfilt(low_cut, dry)
    span = max(int(hold * SR), 2)
    need = np.minimum(1, amp(CEILING_DB) / (np.abs(heard).max(axis=0) + 1e-9))
    gain = uniform_filter1d(minimum_filter1d(need, span), span)
    return filtered(heard * gain, lambda hz: hz < TOP_HZ)


dry = scene()
out = record(dry)
master_out(out)
```